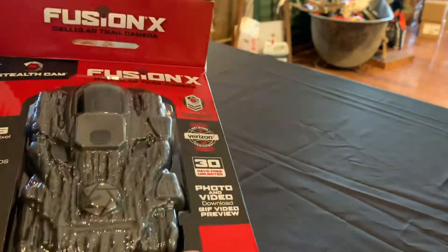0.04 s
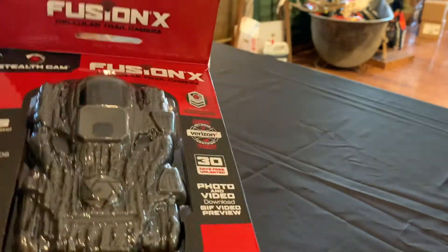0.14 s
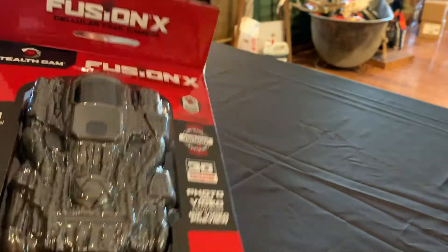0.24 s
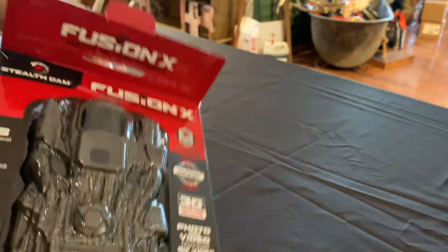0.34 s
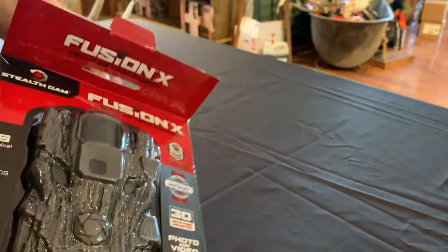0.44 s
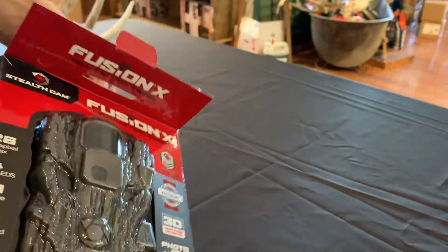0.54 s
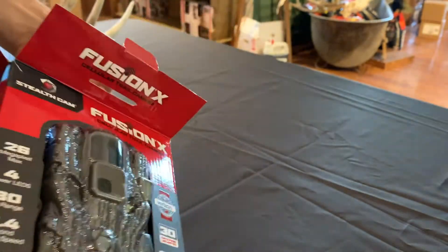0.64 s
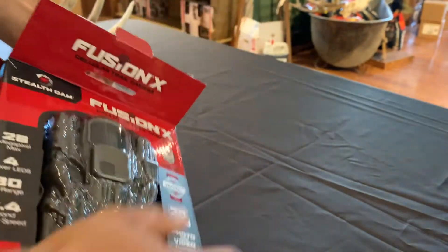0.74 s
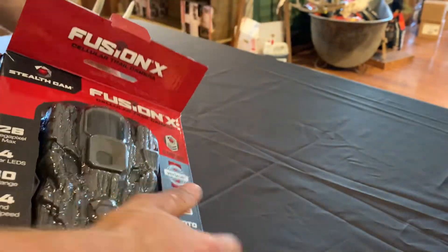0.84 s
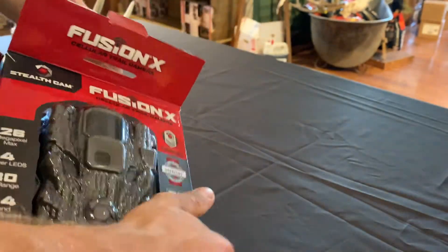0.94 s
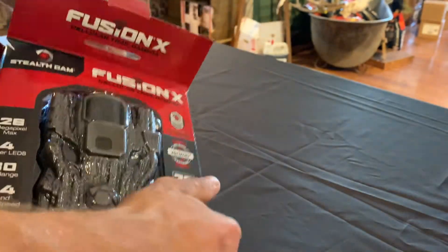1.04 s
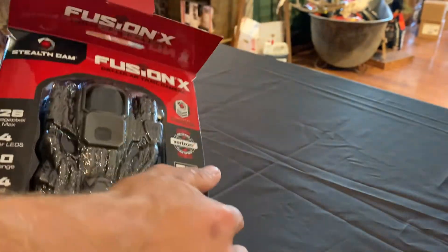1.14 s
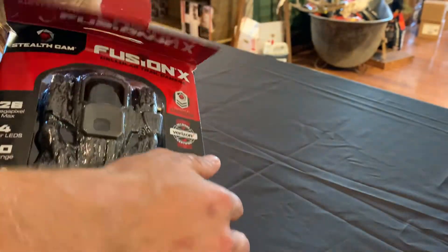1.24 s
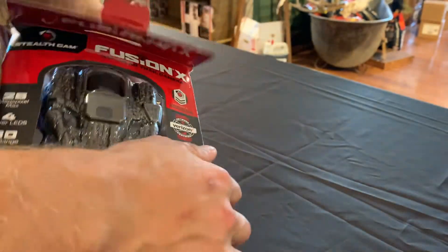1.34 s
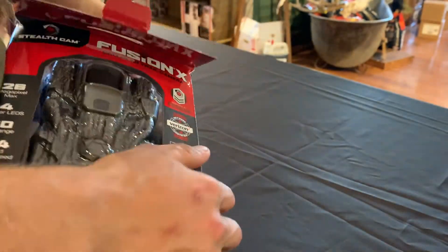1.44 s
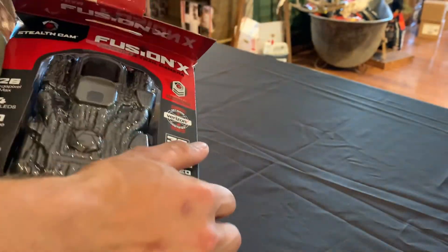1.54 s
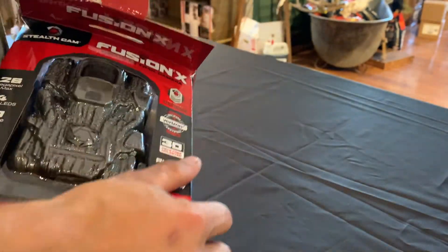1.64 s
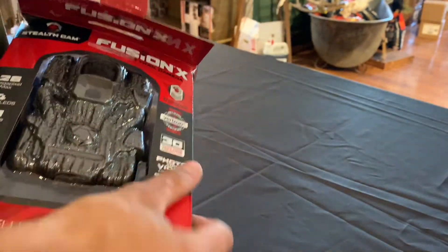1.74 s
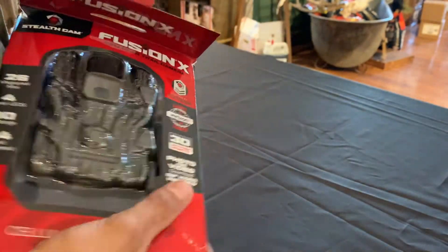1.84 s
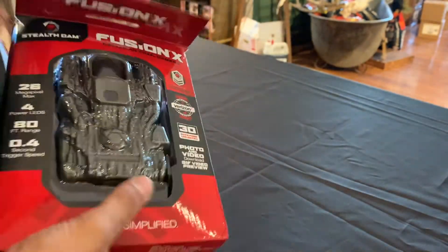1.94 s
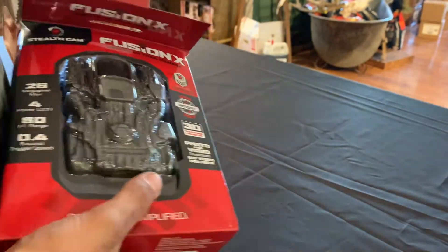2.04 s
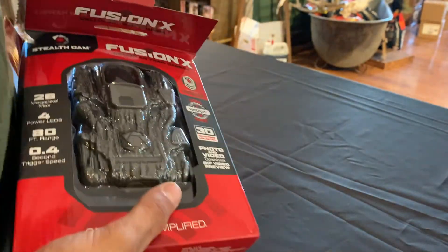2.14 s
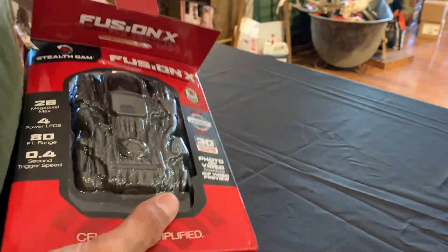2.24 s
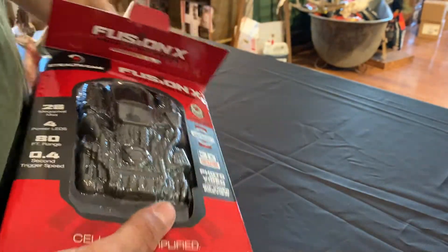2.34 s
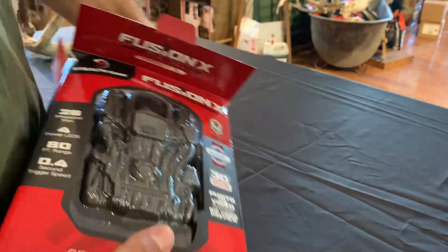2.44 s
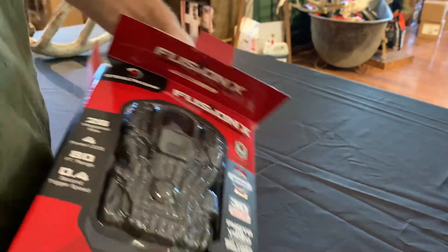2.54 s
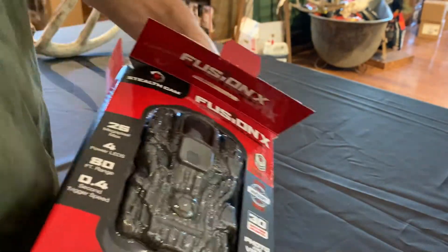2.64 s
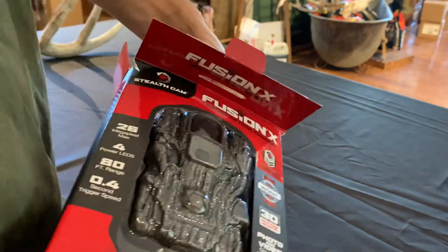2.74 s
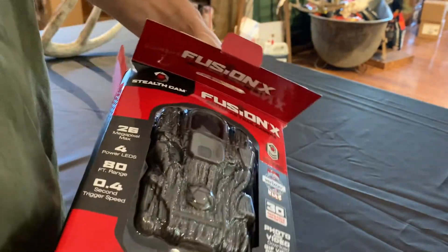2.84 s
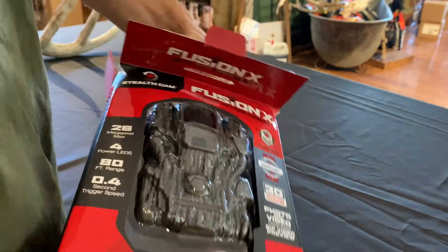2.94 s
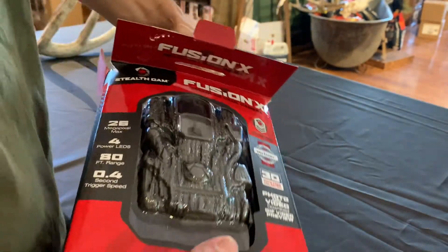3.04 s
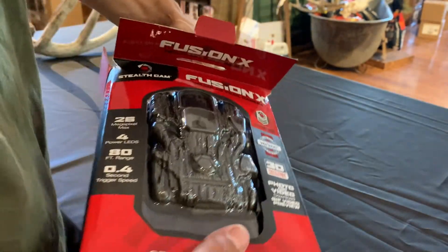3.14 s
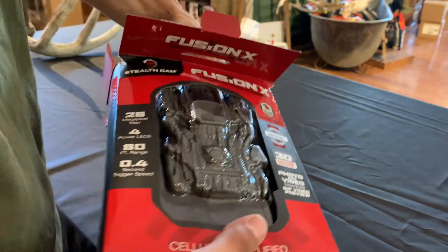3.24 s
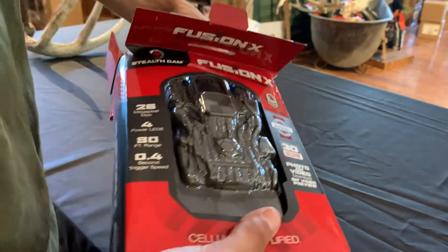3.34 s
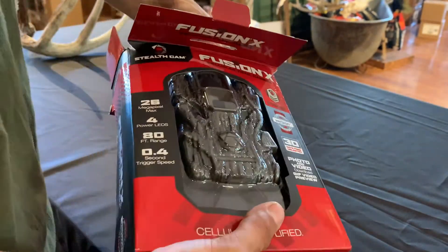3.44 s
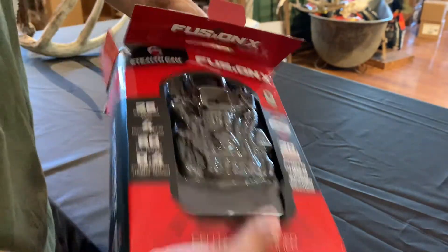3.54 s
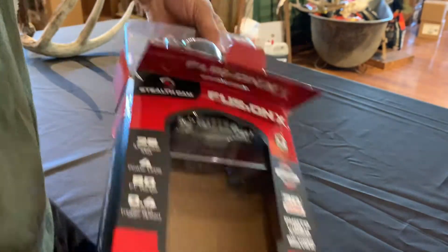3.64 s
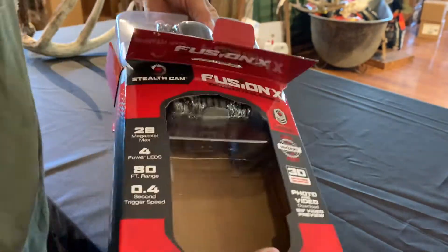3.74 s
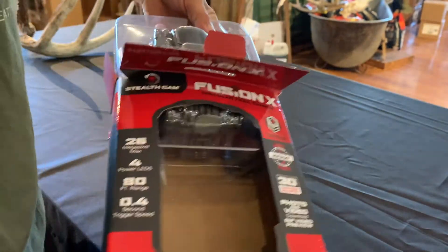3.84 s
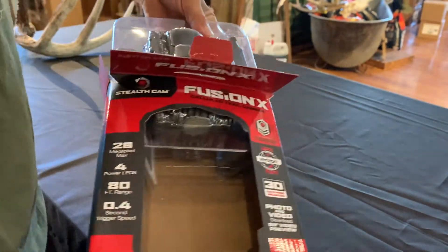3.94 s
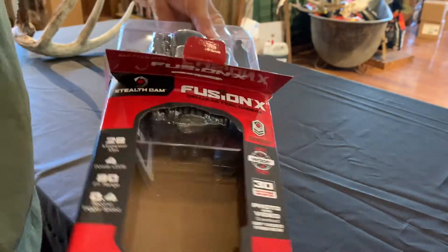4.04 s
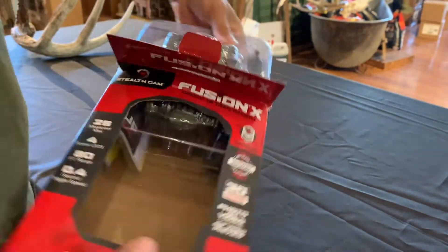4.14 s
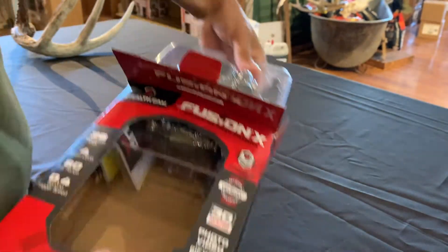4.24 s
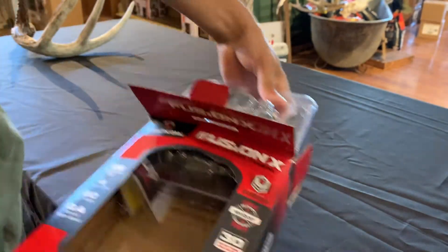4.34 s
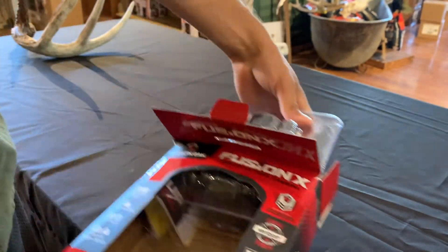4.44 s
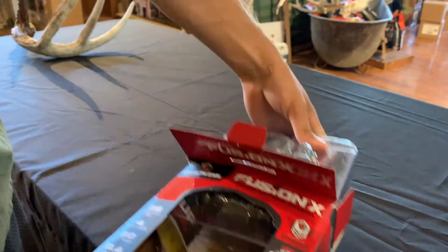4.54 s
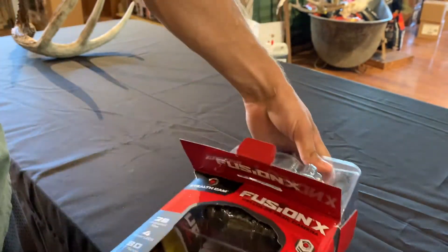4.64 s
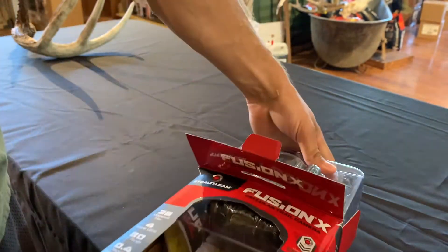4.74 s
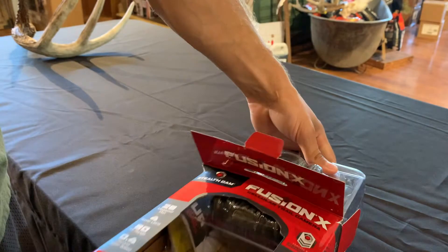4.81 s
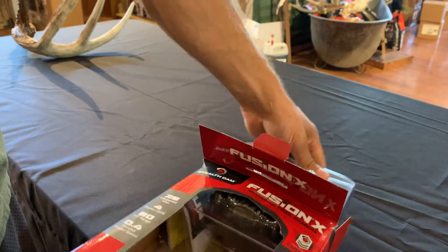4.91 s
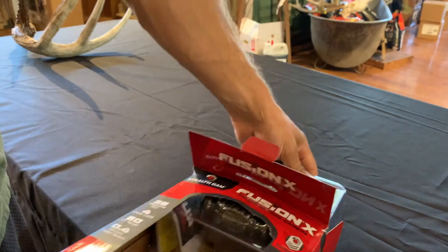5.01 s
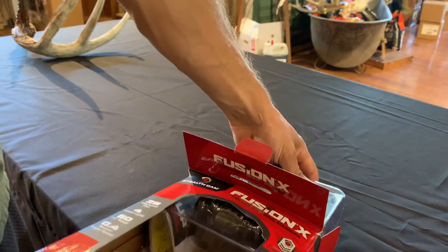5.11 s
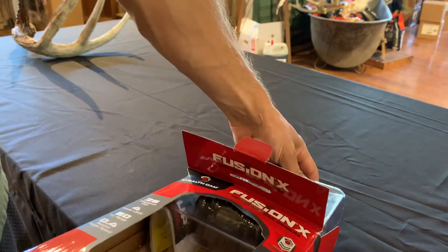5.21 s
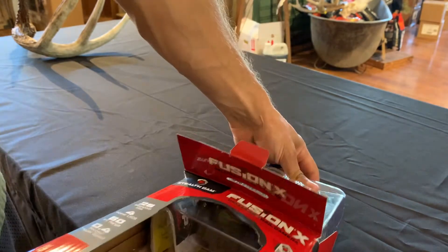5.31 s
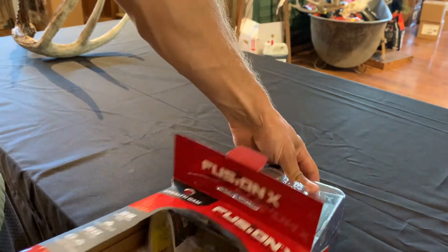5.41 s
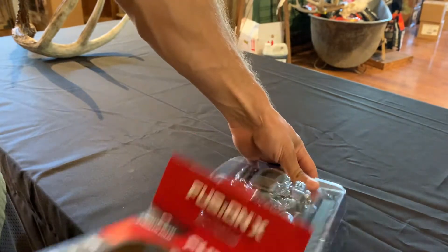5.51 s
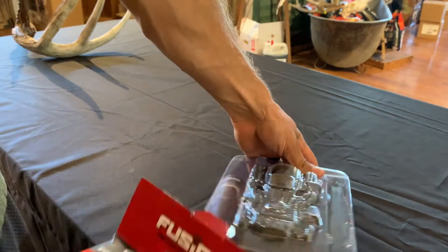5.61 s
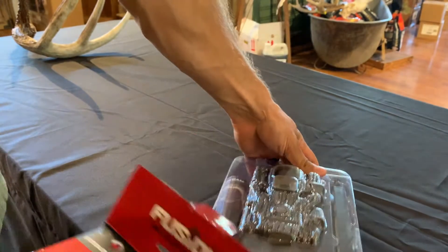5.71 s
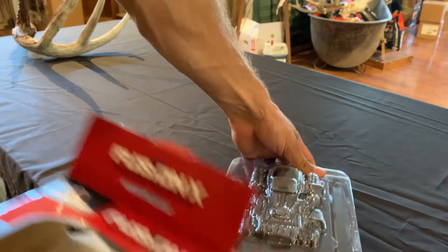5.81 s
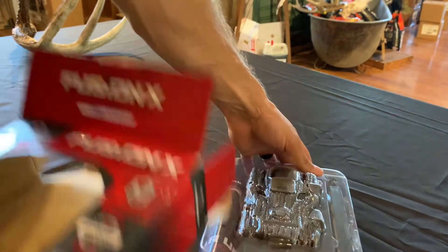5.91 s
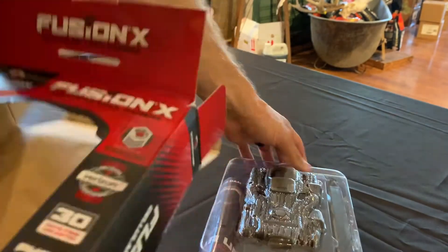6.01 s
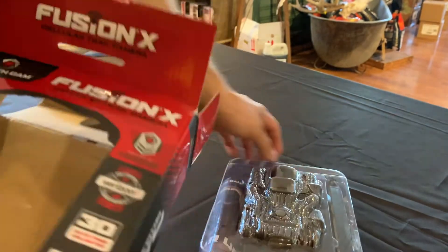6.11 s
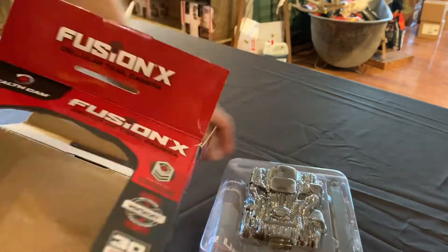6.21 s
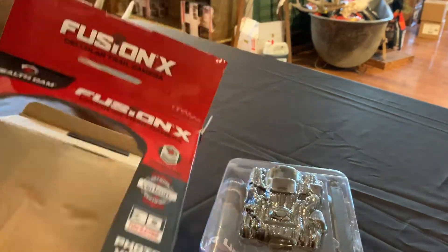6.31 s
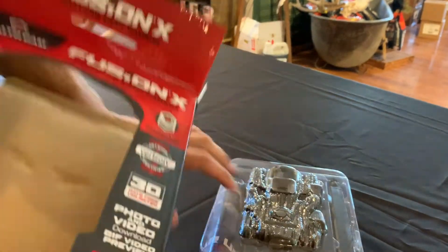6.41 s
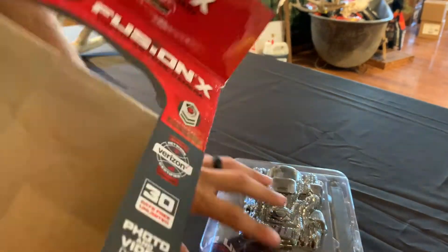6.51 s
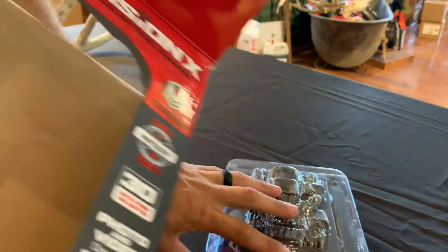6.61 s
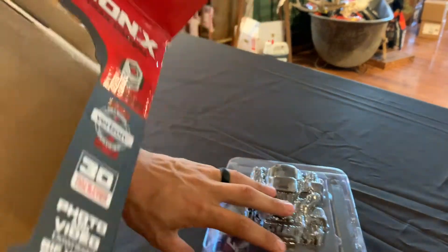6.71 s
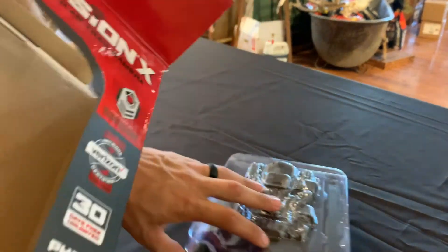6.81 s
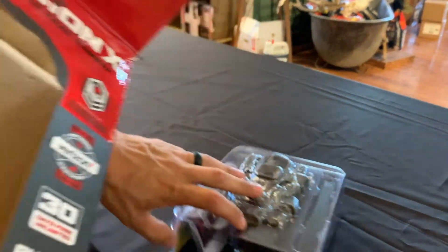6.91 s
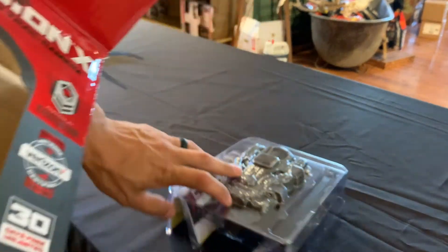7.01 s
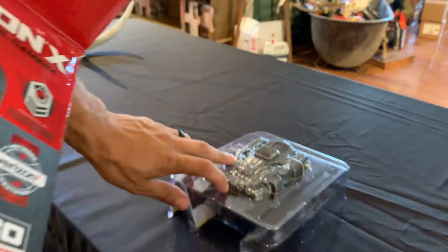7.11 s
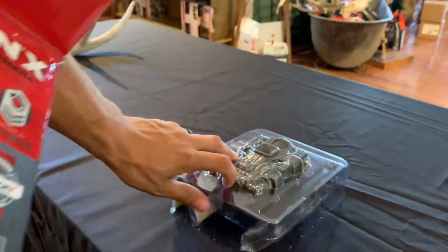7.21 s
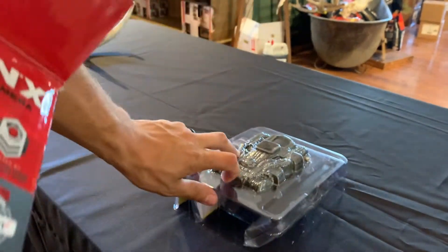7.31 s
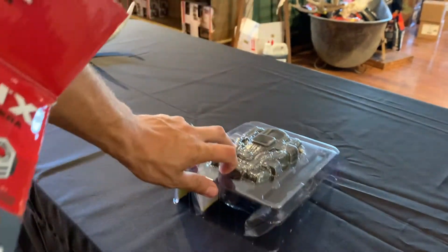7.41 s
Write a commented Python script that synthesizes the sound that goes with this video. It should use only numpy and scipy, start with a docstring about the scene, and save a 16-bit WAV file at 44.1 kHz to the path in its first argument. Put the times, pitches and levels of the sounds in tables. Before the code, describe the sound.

Close up in a fairly live room, hands rub and tap a thin cardboard box, with one sharp panel snap at the start and scattered dry ticks. A plastic tray creaks inside, jerks loose with a loud clustered snap, knocks against the walls and scrapes out. After a quieter pause, it is pushed over a cloth-covered table in two juddering, droning shoves.

```python
"""On a cloth-covered table in a fairly live room, a cardboard box is handled and its end flap worked open.
Rubbed card sounds as filtered random slips; bumps, catches, buckles and snaps as short bursts and rings.
A moulded plastic tray creaks by stick-slip, jerks free, knocks against the box walls and slides out.
Then a hand pushes it across the cloth: juddering friction drives resonances and its thin shell drones."""
import sys
import numpy as np
from scipy import signal
from scipy.fft import rfft, irfft, next_fast_len
from scipy.io import wavfile
from scipy.ndimage import uniform_filter1d, map_coordinates

SR = 44100
rng = np.random.default_rng(int(sys.argv[2]) if len(sys.argv) > 2 else 0)


def dump_mix(stems):
    """Bounce the given channels to the path in sys.argv[1] as a 16-bit WAV at rate SR."""
    frames = np.atleast_2d(stems).T  # one column per channel
    limited = np.clip(frames, -1, 1)  # hard clip at full scale
    pcm = np.round(limited * 32767).astype(np.int16)
    wavfile.write(sys.argv[1], SR, pcm)


N = 328986
TIME = np.arange(N) / SR  # s

# All levels in the tables are relative; spectra are scaled to rms 1 when used.
# spectrum of the still room's air: frequency_hz, weight_db
AIR_SPECTRUM = [(25, 7), (120, -1), (1000, -11), (3000, -14.5), (16000, -35.5)]
# room decay: frequency_hz, t60_s
ROOM_DECAY = [(100, 0.49), (500, 0.46), (2000, 0.58), (6000, 0.26), (14000, 0.69)]
# strength of the room's answer: frequency_hz, level_db
ROOM_ECHO = [(100, 7), (500, -6), (2500, 3.5), (7000, -0.5), (14000, -3)]
# lead of the left ear over the right, following the action: time_s, lead_ms
EAR_LEAD = [(0, .27), (1.2, .23), (3.1, .11), (5.1, .09), (5.5, 0), (6.0, .05), (6.4, .27), (6.7, .05)]
# two bands where the treble is thinner: centre_hz, width_hz, share_removed (held to 0.85 at most)
TREBLE_DIPS = [(8385, 3060, 1), (13550, 920, 0.65)]

# strokes of hand or tray along the card: peak_s, swell_s, fade_s, scrape_db, hiss_db
STROKES = [(.02, 0.32, 0.074, -46, -64), (0.258, 0.63, 0.2, -47.5, -65), (0.541, 0.045, 0.056, -39.5, -46),
           (0.763, 0.02, 0.015, -59, -75), (0.864, 0.27, 0.19, -51.5, -62.5),
           (1.045, 0.1, 0.055, -48, -48.5), (1.248, 0.09, 0.39, -46.5, -58),
           (1.553, 0.089, 0.089, -46, -48), (1.729, 0.076, 0.066, -59.5, -51.5),
           (1.807, 0.069, 0.05, -43, -37), (1.89, 0.17, 0.14, -38, -51.5),
           (2.089, 0.062, 0.088, -42, -49.5), (2.161, 0.074, 0.22, -47.5, -106),
           (2.478, 0.026, 0.039, -40.5, -55), (2.632, 0.32, 0.24, -52, -79),
           (3.544, 0.028, 0.039, -25.5, -24), (3.579, 0.042, 0.032, -27, -28), (3.82, 1, 0.27, -49.5, -58),
           (4.098, 0.08, 0.076, -46.5, -47), (4.22, 0.22, 0.2, -51.5, -86), (4.41, 0.037, 0.13, -50.5, -73),
           (4.55, 0.058, 0.22, -38.5, -65), (4.81, 0.079, 0.17, -49, -70), (4.982, 0.082, 0.17, -36, -51),
           (5.16, 0.037, 0.43, -51.5, -64), (5.335, 0.18, 0.066, -41, -40.5),
           (5.42, 0.15, 0.23, -32, -42.5), (5.497, 0.064, 0.15, -26.5, -31.5),
           (5.82, 0.13, 0.71, -80, -62.5), (6.24, 0.56, 0.056, -82, -67.5),
           (6.385, 0.017, 0.2, -56.5, -44.5), (6.46, 0.066, 0.18, -72, -46.5),
           (6.556, 0.056, 0.085, -40.5, -71)]
# spectrum of flexing panels: frequency_hz, weight_db
FLEX_SPECTRUM = [(25, -45), (45, 4.5), (65, 0), (130, 5), (220, 2.5), (330, -23.5), (700, -27.5)]
# spectrum of scraped fibres: frequency_hz, weight_db
SCRAPE_SPECTRUM = [(120, -24), (280, 6), (520, 1), (800, -1), (1100, -1.5), (1600, -5.5), (2500, -9.5),
                   (4000, -11), (8000, -36)]
# spectrum of crackling fibres: frequency_hz, weight_db
CRACKLE_SPECTRUM = [(250, -20.5), (700, 1), (3000, -2), (4400, 3.5), (7000, 4.5), (11000, 2), (15500, -15)]
# spectrum of the glossy surface's hiss: frequency_hz, weight_db
HISS_SPECTRUM = [(1200, -0.5), (2500, 3.5), (4000, -2.5), (7000, 5), (11000, 4.5), (15500, -5.5)]
# soft bumps of hand and tray on the box: start_s, level_db, pitch_hz
BUMPS = [(0.007, -22.5, 319), (0.262, -33, 238), (0.391, -32, 363), (0.811, -35, 248), (0.854, -32.5, 348),
         (1.044, -29, 288), (1.092, -37, 370), (1.164, -36.5, 327), (1.242, -25.5, 313), (1.298, -29, 395),
         (1.449, -32.5, 304), (1.539, -35, 205), (1.891, -20.5, 413), (1.917, -28, 132), (2.305, -31, 272),
         (2.466, -26, 286), (3.549, -14, 116), (4.006, -35.5, 236), (4.265, -34.5, 230), (4.347, -24, 325),
         (4.457, -26, 273), (4.58, -23, 246), (4.591, -20.5, 168), (4.636, -21, 316), (4.757, -25.5, 140),
         (4.806, -25.5, 255), (4.844, -27.5, 277), (5.022, -19.5, 187), (5.452, -15.5, 82),
         (5.482, -13.5, 132), (5.622, -19, 78), (5.903, -31, 127), (6.556, -24.5, 159), (6.603, -27, 149)]
# creases in card and plastic that buckle: time_s, level_db, pitch_hz
TICKS = [(0.2267, -25, 4070), (0.4, -34, 3580), (0.5208, -20, 2660), (0.6674, -25.5, 4600),
         (0.688, -28, 4600), (0.809, -28, 3450), (0.8512, -25, 7000), (0.8654, -29, 6700),
         (0.972, -30.5, 4340), (1.0447, -30, 7150), (1.448, -32.5, 3100), (1.5623, -34, 4000),
         (1.82, -20.5, 1970), (2.0904, -24, 4920), (2.137, -27.5, 5500), (2.2715, -31.5, 4370),
         (2.392, -24.5, 4630), (2.487, -35, 4440), (2.574, -28, 2780), (2.601, -19, 2700),
         (2.798, -20.5, 2850), (4.455, -27, 6300), (4.965, -16.5, 3500), (5.217, -24.5, 2280),
         (5.234, -28, 2420), (5.27, -26, 2310)]
# edges catching and slipping off: time_s, level_db, treble_db, nominal_length_s
CATCHES = [(1.233, -37.5, -41, 0.0012), (1.765, -56, -37, 0.0026), (1.791, -30.5, -27, 0.002),
           (1.97, -28.5, -40, 0.00083), (2.514, -33, -53, 0.00075), (2.612, -30.5, -44, 0.0015),
           (2.679, -33.5, -42, 0.00059), (3.521, -28, -38.5, 0.0038), (4.346, -32.5, -63, 0.0015),
           (4.517, -19.5, -50, 0.0011), (4.633, -23, -27, 0.0019), (4.749, -26.5, -31.5, 0.0014),
           (5.481, -24.5, -33, 0.0058), (5.596, -42, -34.5, 0.0046), (5.893, -48.5, -55, 0.0025),
           (6.398, -30.5, -30.5, 0.0011)]
# spectrum of a catching edge: frequency_hz, weight_db
CATCH_SPECTRUM = [(100, -33), (300, -6), (600, -2.5), (1150, 0.5), (1700, -7), (2400, -8), (4500, -8.5),
                  (8000, -16.5), (15500, -19)]
# box panels snapping through: start_s, ring_db, pitch_hz, t60_s, overtone_db, crack_db, crack_length_s
SNAPS = [(0.1096, 5.5, 407, 0.013, -2, -18.5, 0.00065), (3.5261, -2.5, 318, 0.02, -7.5, -22.5, 0.00038),
         (3.539, -3.5, 419, 0.025, 1.5, -24.5, 0.0006), (3.598, -4.5, 278, 0.021, -6.5, -16.5, 0.00132)]

# steady rubbing of the tray on the card: time_s, level_db
SLIDE_LEVELS = [(2.89, -66.5), (2.96, -56), (3.12, -59), (3.42, -57), (3.52, -86)]
# resonances of the box wall it rubs on: centre_hz, width_hz, level_db
WALL_MODES = [(711, 470, 2), (1020, 140, 8), (1590, 1200, -10)]
# single slips of the tray along the box wall: start_s, level_db
CREAKS = [(2.954, -42.5), (2.975, -44.5), (2.981, -38.5), (3.004, -41.5), (3.04, -41.5), (3.1004, -41.5),
          (3.169, -33.5), (3.2295, -41), (3.264, -36.5), (3.283, -40.5), (3.3185, -35), (3.35, -35),
          (3.366, -36.5), (3.391, -34), (3.4033, -36.5), (3.4306, -37), (3.457, -36), (4.043, -41),
          (4.069, -34), (4.078, -34), (4.087, -41)]
# spectrum of a creak: frequency_hz, weight_db
CREAK_SPECTRUM = [(1000, -24.5), (2200, -12.5), (4000, 1), (7000, -4), (11000, 5.5), (15500, -3)]
# tray pushed over the cloth in two shoves: time_s, shell_db, drone_db, rasp_db
PUSH_LEVELS = [(6.684, -64, -58, -39), (6.69, -52, -37, -42), (6.78, -42.5, -35, -40),
               (6.88, -42, -30, -34.5), (6.97, -43, -27.5, -32.5), (7.08, -37, -37, -36.5),
               (7.16, -29.5, -48, -43.5), (7.235, -51, -49, -48), (7.264, -30, -44, -38),
               (7.315, -32, -43, -36.5), (7.336, -25.5, -46, -27.5), (7.39, -22, -36, -30.5),
               (7.46, -27.5, -41, -39.5)]
# resonances of the hollow tray shell: centre_hz, width_hz, level_db
SHELL_MODES = [(221.5, 18, 5), (370, 23, -3), (441.5, 19, -3)]
# resonances of the tray's droning base: centre_hz, width_hz, level_db
DRONE_MODES = [(141.5, 30, 1), (576.4, 33, 5), (623, 55, -1.5), (733, 45, -9)]
# resonances of the tray's rasping walls: centre_hz, width_hz, level_db
RASP_MODES = [(330, 120, 5), (445, 70, 3.5), (982, 180, -1.5), (1170, 110, 2), (1450, 170, -11.5),
              (1630, 63, -10), (1895, 120, -7), (2310, 410, -14.5), (2875, 200, -10.5), (3300, 75, -12.5),
              (3820, 200, -16.5), (4360, 170, -15)]
# spectrum of the cloth's hiss: frequency_hz, weight_db
CLOTH_SPECTRUM = [(1500, -4), (5000, -2.0), (7000, 10.0), (11000, 14.5), (15500, -1.5)]

STROKE_RANGE_DB, STROKE_ROUNDNESS = 18.5, 1.15  # drop one swell before and one fade after the peak
HISS_FOLLOWS = 1.88  # dB of hiss per dB of the stroke's swell
FLEX_DB, FLEX_AT_SCRAPE_DB, FLEX_FOLLOWS = -44.5, -39, 1.36  # the harder the rubbing, the more panels give
CRACKLES_PER_S, CRACKLE_SPREAD_DB = 220, 4
KNOCKS_PER_S, KNOCK_DB = 9, -7  # each panel gives way in small random knocks under the rubbing
CREAK_S, CREAK_EDGE_DB, CREAK_BODY_DB = 0.00066, 3.5, -3.5
CLOTH_DB = -5.5  # cloth hiss relative to the rasp it follows
RASP_WIDTH_DB = -6.5  # the tray's two flanks rasp with their own grain
DRONE_PAN_DB = -10.5  # left minus right; the deep modes spread more evenly
# the fingers load the tray's modes unevenly and bend their pitch by this share
MODE_WANDER_DB, MODE_WANDER_PER_S, MODE_BEND = 6, 14, .012
TRAY_SETTLE_S = 0.027  # steady pressure evens out the ringing over this time
TICK_ROOM_DB = -4  # the tiny ticks leave a fainter room tail
CUTOFF_HZ = 16000


def from_db(db):
    """Decibels are twenty times the logarithm of an amplitude ratio."""
    return 10 ** (np.asarray(db) / 20)


def rms_one(x):
    """Root-mean-square normalisation: unit mean power."""
    return x / np.sqrt(np.mean(x ** 2) + 1e-20)


def at_hz(points, hz):
    """Logarithmic frequency scale: read a table in equal steps per octave."""
    known_hz, values = np.transpose(points)
    return np.interp(np.log(hz + 0.0012), np.log(known_hz), values)


def coloured(x, spectrum):
    """Linear filtering: weight the Fourier components by a smooth spectrum; rms 1."""
    size = next_fast_len(len(x))
    weights = from_db(at_hz(spectrum, np.fft.rfftfreq(size, 1 / SR)))
    return rms_one(irfft(rfft(x, size) * weights, size)[:len(x)])


def gains(rows):
    """Amplitude envelopes, one per dB column: near silent before the first row, the last row held."""
    s, *columns = np.transpose(rows)
    return [from_db(np.interp(TIME, s, column, left=-140)) for column in columns]


def drift(rate):
    """Random modulation: straight lines join normal draws of spread 1, `rate` of them per second."""
    knots = rng.standard_normal(8192)
    return np.interp(TIME * rate, np.arange(len(knots)), knots)


def resonate(x, hz, width_hz):
    """Resonance: a two-pole band with gain 1 on top, damped according to its width."""
    r = np.exp(-np.pi * width_hz / SR)
    zeros = np.array([1, 0, -1]) * (1 - r * r) / 2
    poles = [1, -2 * r * np.cos(2 * np.pi * hz / SR), r * r]
    return signal.lfilter(zeros, poles, x + 1e-18)


def add(track, s, sound):
    """Superposition: lay a sound into the track at s seconds."""
    start = max(round(s * SR), 0)
    track[start:start + len(sound)] += sound[:N - start]


def slips(per_s, spread_db):
    """Dry friction: tiny slips of uneven size and either sign at random moments."""
    sizes = from_db(spread_db * np.minimum(rng.exponential(1, N), 4)) * rng.choice([-1, 1], N)
    return sizes * (rng.random(N) < per_s / SR)


def burst(spectrum, length_s):
    """Transient friction: a quick noisy run of fibre slips peaks after length_s and dies away."""
    age = TIME[:8192] / length_s
    swell = age * np.exp(1 - age)
    run = rfft(rng.standard_normal(len(age)) * swell)
    evened = irfft(run / np.abs(run) ** .7)  # flatten most of the chance peaks in the spectrum
    shaped = coloured(evened, spectrum)
    return shaped[:len(age) // 2] * np.sqrt(np.mean(swell ** 2))


def panel(hz, t60, overtone_db, hollow_db, glide=1.576, glide_s=0.00383):
    """Bending-wave dispersion: short waves arrive first, so the ring falls in pitch; the box air hums."""
    t = TIME[:8192]
    cycles = hz * (t + glide * glide_s * (1 - np.exp(-t / glide_s)))
    modes = [(1, 3.68, 1), (1.4, overtone_db, 0.34), (2.3, overtone_db - 4.5, 0.97)]  # ratio, dB, t60 share
    ring = 0
    for ratio, db, share in modes:
        ring = ring + from_db(db - 60 * t / (t60 * share)) * np.sin(2 * np.pi * ratio * cycles)
    hollow = from_db(hollow_db - 60 * t / (2.0 * t60)) * np.sin(2 * np.pi * 235 * t)
    swing = -(ring + hollow) * (1 - np.exp(-t / 0.002))
    # little radiates below the panel's pitch
    return signal.sosfilt(signal.butter(2, .5 * hz, "high", fs=SR, output="sos"), swing)


def room_air():
    """Broadband background noise: the still room as coloured noise, independent in each ear."""
    return from_db(-73.0) * np.array([coloured(rng.standard_normal(N), AIR_SPECTRUM) for ear in range(2)])


def walls(x, tail_db):
    """Reverberation: diffuse echoes decay exponentially at a rate set by frequency, a tail for each ear."""
    t = TIME[:SR * 3 // 4]
    edges = np.geomspace(50, 18000, 9)
    response = 0
    for low, high in zip(edges, edges[1:]):
        hz = np.sqrt(low * high)
        band = signal.butter(2, [low, high], "band", fs=SR, output="sos")
        left, right, both = signal.sosfilt(band, rng.standard_normal((3, len(t))))
        alike = 1 / (1 + (hz / 380) ** 2)  # long waves reach both ears alike
        noise = np.sqrt(1 - alike) * np.array([left, right]) + np.sqrt(alike) * both
        tail = from_db(-60 * t / at_hz(ROOM_DECAY, hz)) * np.clip(t / 0.0019, 0, 1)
        response = response + noise * from_db(tail_db + at_hz(ROOM_ECHO, hz)) * rms_one(tail)
    return signal.fftconvolve(x[None], response / np.sqrt(len(t)), axes=1)[:, :N]


def table_bounce(x):
    """Interference: a reflection off the table takes a path that changes as the hands move."""
    path = .0016 * SR * from_db(2 * drift(2))  # delay in samples
    return x + .35 * map_coordinates(x, [np.arange(N) - path], order=3)


def stroke_gains():
    """Power addition of strokes: each swells and fades; hiss and flexing rise faster than the scrape."""
    scrape_power = hiss_power = 1e-18
    for s, swell_s, fade_s, scrape_db, hiss_db in STROKES:
        away = np.minimum(np.maximum((s - TIME) / swell_s, (TIME - s) / fade_s), 6)
        shape_db = -STROKE_RANGE_DB * np.abs(away) ** STROKE_ROUNDNESS
        scrape_power = scrape_power + from_db(scrape_db + shape_db) ** 2
        hiss_power = hiss_power + from_db(hiss_db + HISS_FOLLOWS * shape_db) ** 2
    scrape = np.sqrt(scrape_power)
    flex = from_db(FLEX_DB) * (scrape / from_db(FLEX_AT_SCRAPE_DB)) ** FLEX_FOLLOWS
    return flex, scrape, np.sqrt(hiss_power)


def rubbing(grip):
    """Friction noise: rubbed panels flex, fibres scrape and crackle, and the gloss hisses."""
    flex, scrape, hiss = stroke_gains()
    crackle = np.sqrt(scrape * np.sqrt(scrape * hiss))
    crackle = np.minimum(crackle, from_db(-45))  # fibres can snap only so hard
    flexing = coloured(slips(900, 1.6), FLEX_SPECTRUM)
    scraping = coloured(slips(650, 1.9) * from_db(3.4 * grip), SCRAPE_SPECTRUM)
    crackling = coloured(slips(CRACKLES_PER_S, CRACKLE_SPREAD_DB), CRACKLE_SPECTRUM)
    hissing = coloured(slips(3500, 1.3) * from_db(2 * grip), HISS_SPECTRUM)
    return (flex * flexing + scrape * from_db(0.53) * scraping
            + crackle * from_db(-0.5) * crackling + hiss * from_db(6.0) * hissing)


def bump(hz):
    """Soft impact: a contact sets a panel ringing without a crack."""
    return panel(hz, 0.054 * np.sqrt(300 / hz), overtone_db=-0.5, hollow_db=-13.5)


def bumps():
    """Impulse excitation: single bumps, and small knocks of four panels giving way under the strokes."""
    scrape = np.minimum(stroke_gains()[1], from_db(-41))  # a panel gives only so far
    knocks = 0
    for hz in np.geomspace(220, 620, 4):
        knocks = knocks + signal.oaconvolve(slips(KNOCKS_PER_S, 2), bump(hz))[:N]
    out = scrape * from_db(KNOCK_DB) * rms_one(knocks)
    for s, db, hz in BUMPS:
        add(out, s, from_db(db - 5.5) * bump(hz))
    return out


def ticks():
    """Buckling instability: a crease gives a dry, broad crack over a faint lower knock."""
    out = np.zeros(N)
    for s, db, hz in TICKS:
        spectrum = [(hz / 14, -14), (hz / 9.9, -3), (hz / 5.4, -5), (hz, 0), (hz * 1.94, -5), (hz * 6, -16)]
        add(out, s - .0003, from_db(db - 7.5) * burst(spectrum, 0.00076))
    return out


def catches():
    """Static friction and release: an edge drags for a moment, catches and rasps free."""
    out = np.zeros(N)
    for s, db, treble_db, length_s in CATCHES:
        length_s = max(length_s, .001)
        body = from_db(db) * burst(CATCH_SPECTRUM, 2.44 * length_s)
        treble = from_db(treble_db + 10.0) * burst(HISS_SPECTRUM, .5 * length_s)
        drag = from_db(db - 20) * burst(CATCH_SPECTRUM, 0.0026)
        add(out, s - .007, drag)
        add(out, s - .001, body + treble)
    return out


def snaps():
    """Snap-through: a crack as the edge lets go, then the freed panel swings in its modes."""
    out = np.zeros(N)
    for s, ring_db, hz, t60, overtone_db, crack_db, crack_s in SNAPS:
        crack = burst(HISS_SPECTRUM, crack_s) + from_db(6.5) * burst(CATCH_SPECTRUM, crack_s)
        ring = panel(hz, t60, overtone_db, hollow_db=-14.5, glide=2.42, glide_s=0.0013)
        add(out, s, from_db(crack_db) * crack)
        add(out, s + crack_s, from_db(ring_db) * ring)
    return out


def tray_slide():
    """Forced resonance: fine slips of the creeping tray excite the box wall, with faint creaks among them."""
    level, = gains(SLIDE_LEVELS)
    friction = slips(3000, 2.1)
    wall = 0
    for k, (hz, width_hz, db) in enumerate(WALL_MODES):
        wall = wall + (-1) ** k * from_db(db) * resonate(friction, hz, width_hz)  # polarity alternates
    faint_creaks = from_db(-3.5) * coloured(slips(35, 2.5), CREAK_SPECTRUM)
    return level * (rms_one(wall) + faint_creaks)


def creaks():
    """Stick-slip: each slip of plastic on card is a short, bright, dry tick with a little wall body."""
    out = np.zeros(N)
    for s, db in CREAKS:
        edge = from_db(CREAK_EDGE_DB) * burst(CREAK_SPECTRUM, CREAK_S)
        body = from_db(CREAK_BODY_DB) * burst(CATCH_SPECTRUM, 2 * CREAK_S)
        add(out, s, from_db(db) * (edge + body))
    return out


def stick_slip_judder():
    """Relaxation oscillation: an uneven slip cycle jumps up and decays, about 135 times a second."""
    slip_cycle = np.cumsum(135 * from_db(3.2 * drift(90))) / SR % 1
    return (.28 + np.exp(-slip_cycle / .22)) * from_db(2.5 * drift(80))


def tray_ring(judder, modes, pan_db=0):
    """Driven modes: friction keeps resonances ringing, wavering in strength and pitch; stereo, near rms 1."""
    friction = judder * rng.standard_normal(N)
    ring = 0
    for k, (hz, width_hz, db) in enumerate(modes):
        load = drift(MODE_WANDER_PER_S)
        load_to_end = np.cumsum(load[::-1])[::-1] / SR
        # reading at a wandering pace bends the pitch
        mode = np.interp(TIME - MODE_BEND * load_to_end, TIME, resonate(friction, hz, width_hz))
        side_db = pan_db / 2 * min(hz / 580, 1) ** 2
        ear_gains = from_db([[db + side_db], [db - side_db]])
        ring = ring + (-1) ** k * ear_gains * (from_db(MODE_WANDER_DB * load) * mode)
    power = uniform_filter1d(np.mean(ring ** 2, axis=0), int(TRAY_SETTLE_S * SR))
    return ring / np.sqrt(power + 1e-12)


def tray_push(judder):
    """Friction-driven shell: stick-slip on cloth rings the tray and sheds puffs of bright hiss; stereo."""
    shell, drone, rasp = gains(PUSH_LEVELS)

    def rasp_and_cloth():
        """Amplitude modulation: the cloth hiss swells with the square root of the judder."""
        cloth = coloured(np.sqrt(judder) * slips(11000, 3.2), CLOTH_SPECTRUM)
        return tray_ring(judder, RASP_MODES) + from_db(CLOTH_DB) * cloth

    front, flank = rasp_and_cloth(), rasp_and_cloth()
    wide = front + from_db(RASP_WIDTH_DB) * flank * [[1], [-1]]
    return (shell * tray_ring(judder, SHELL_MODES)
            + drone * tray_ring(judder, DRONE_MODES, DRONE_PAN_DB) + rasp * wide)


def scene():
    """Interaural delay and reflection: close action reaches one ear first; table and room answer."""
    grip = drift(90)  # the pressure of the contact comes and goes
    judder = stick_slip_judder()
    # two sides rub at once, each with its own grain; the second widens all but the bass
    front, flank = (rubbing(grip) + tray_slide() for side in range(2))
    flank = from_db(-6) * signal.sosfilt(signal.butter(2, 500, "high", fs=SR, output="sos"), flank)
    box = snaps() + bumps() + catches() + table_bounce(front)
    clicks = ticks() + creaks()
    tray = tray_push(judder)

    lead = np.interp(TIME, *np.transpose(EAR_LEAD)) * SR / 1000  # ms to samples
    ears = []
    for side, tray_ear in zip((1, -1), tray):  # left, right
        ear = box + clicks + tray_ear + side * flank
        ears.append(map_coordinates(ear, [np.arange(N) + side * lead / 2], order=3))
    to_room = box + from_db(TICK_ROOM_DB) * clicks + tray.mean(axis=0)
    return np.array(ears) + walls(to_room, tail_db=-9.0) + room_air()


def record(dry):
    """Band limiting and saturation: bass rolled off, two treble bands thinned, peaks rounded, the top cut."""
    thin = signal.sosfilt(signal.butter(2, 45, "high", fs=SR, output="sos"), dry)
    for hz, width_hz, share in TREBLE_DIPS:
        thin = thin - min(share, .85) * resonate(thin, hz, width_hz)
    rounded = 1.2 * np.tanh(thin / 1.2)
    return signal.sosfilt(signal.ellip(10, .1, 80, CUTOFF_HZ, fs=SR, output="sos"), rounded)


dry = scene()
out = record(dry)
dump_mix(out)
```